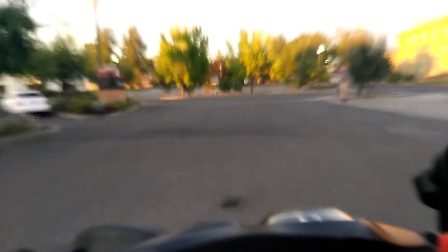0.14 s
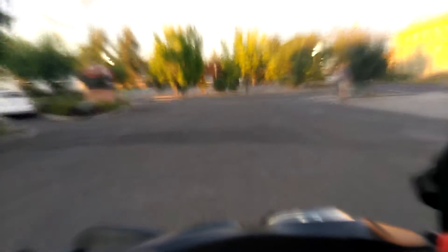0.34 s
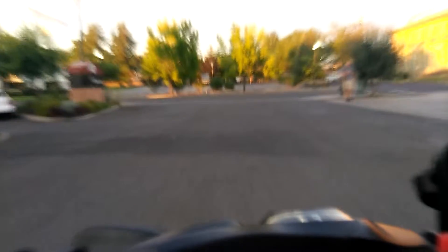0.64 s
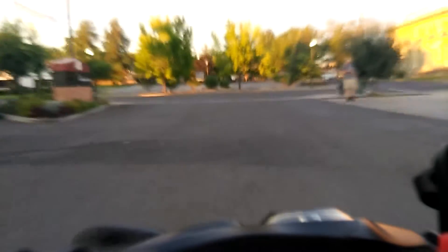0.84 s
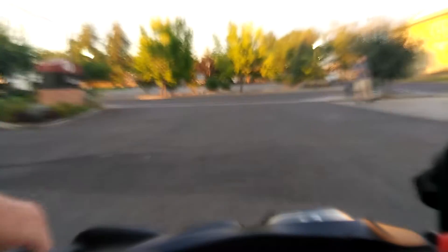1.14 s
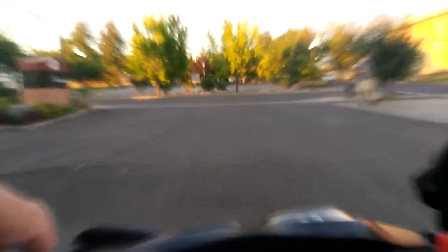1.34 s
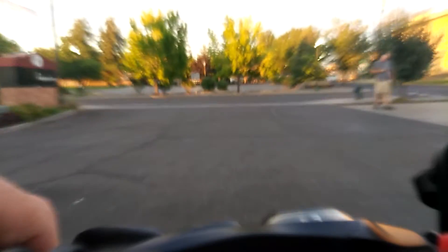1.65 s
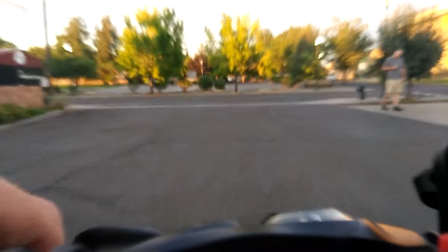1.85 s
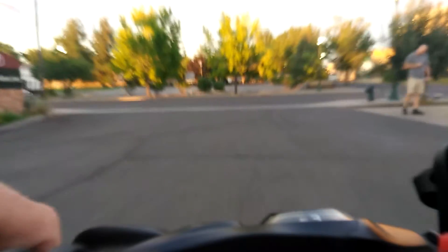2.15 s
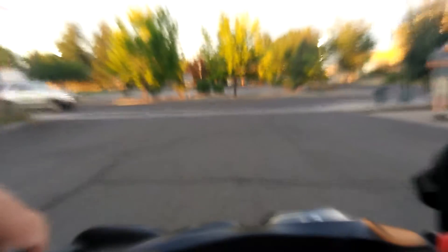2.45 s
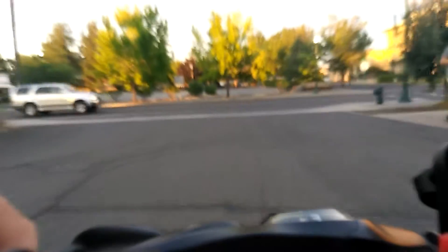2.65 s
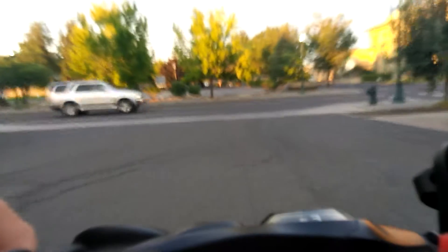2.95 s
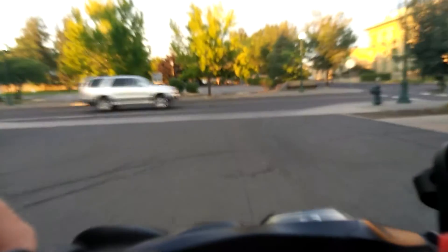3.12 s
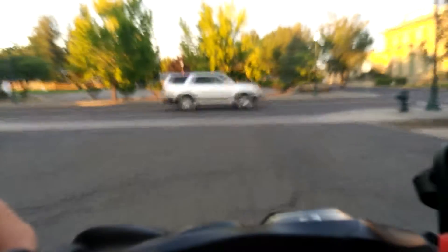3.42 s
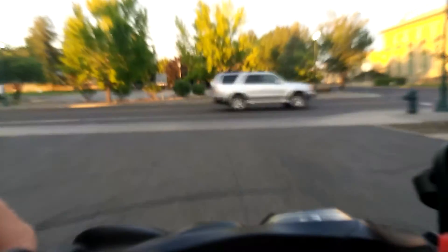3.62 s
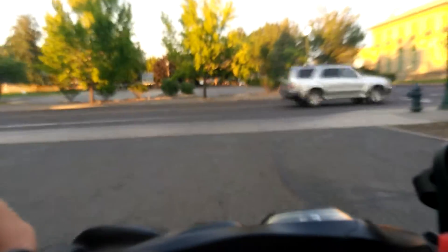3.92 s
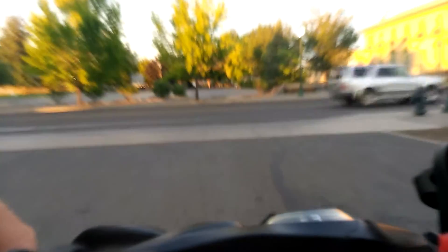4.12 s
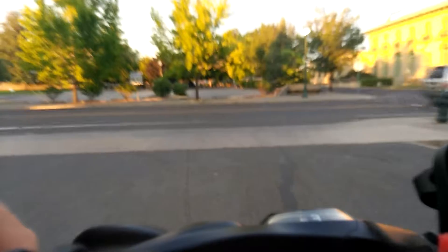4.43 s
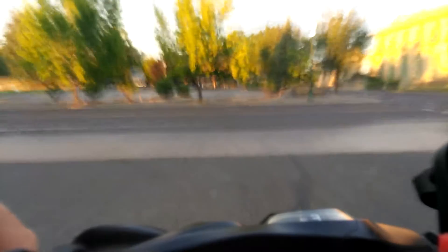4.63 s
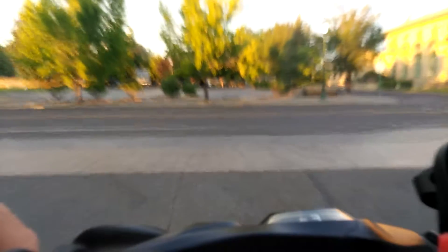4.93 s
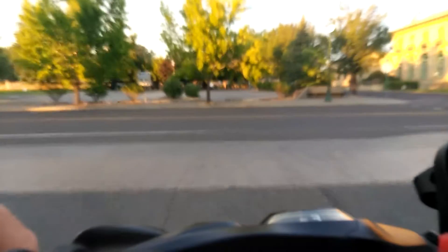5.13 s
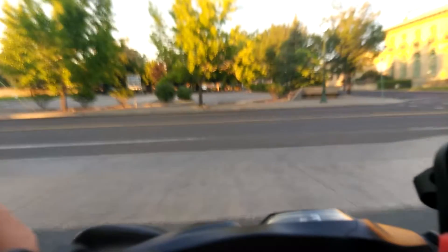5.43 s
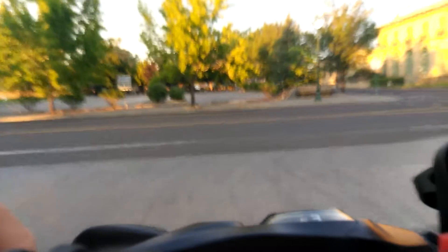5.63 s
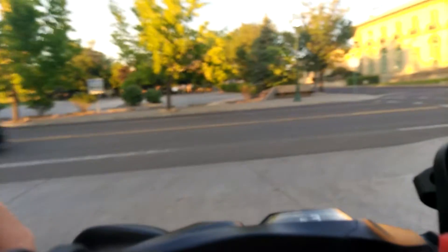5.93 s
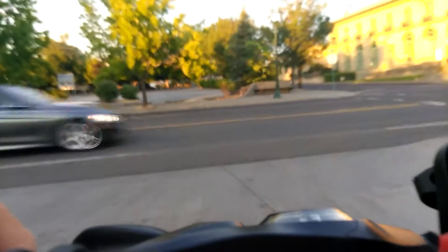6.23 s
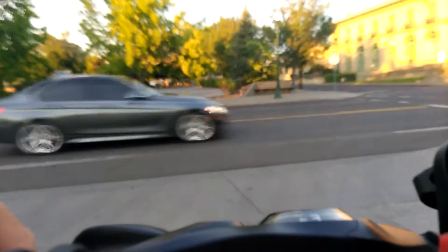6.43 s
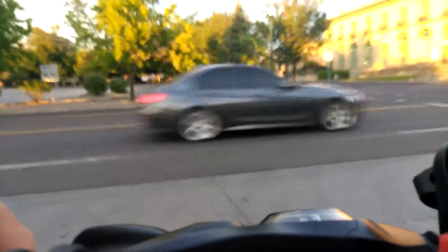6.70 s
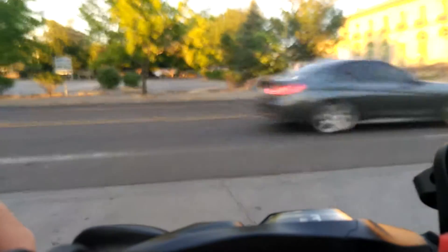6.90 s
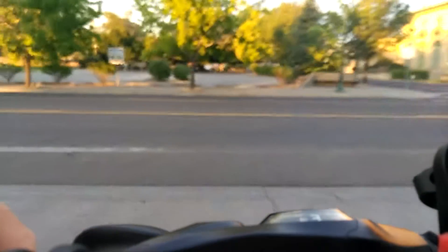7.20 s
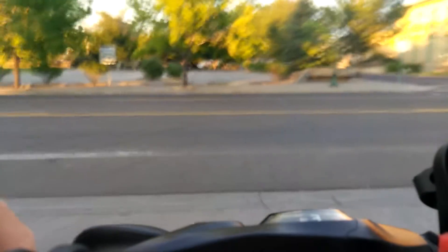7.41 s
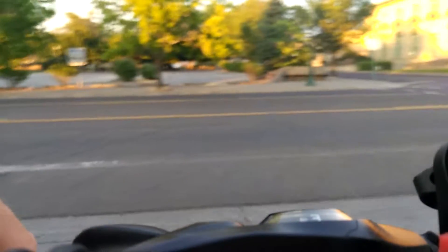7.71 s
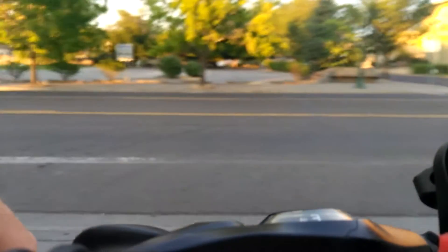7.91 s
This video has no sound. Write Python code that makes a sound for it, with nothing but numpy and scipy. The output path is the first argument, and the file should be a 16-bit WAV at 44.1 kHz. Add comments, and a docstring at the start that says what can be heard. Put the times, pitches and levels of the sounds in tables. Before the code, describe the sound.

A coasting bicycle ticks and rattles, then its disc brake squeals in high pulses and sharp shrieks as two cars pass.

```python
"""A car park beside a road, heard from a stereo camera on the frame of a bicycle that coasts to a stop.
Further off, two cars roll past on humming tyres and the first pulls away. The asphalt rumbles up through
the frame, cracks thump and loose parts chatter. Close to the microphones the freewheel pawls tick as the
wheel slows and the brake pad hisses on the disc. In front of it all the disc squeals: in swells as its
high spots pass the pad, in sharp shrieks when the pad grabs."""
import sys
import numpy as np
from scipy import signal
from scipy.fft import rfft, irfft, next_fast_len
from scipy.io import wavfile
from scipy.ndimage import uniform_filter1d, map_coordinates

SR = 44100
rng = np.random.default_rng(int(sys.argv[2]) if len(sys.argv) > 2 else 0)


def generate_wav(sig):
    """Save sig (samples, or channels by samples) to the path in sys.argv[1] as 16-bit PCM at SR."""
    pcm = np.round(np.clip(np.atleast_2d(sig).T, -1, 1) * 32767).astype(np.int16)
    wavfile.write(sys.argv[1], SR, pcm)


N = 355446
T = np.arange(N) / SR
TOP_HZ = 15900  # upper limit of the camera's sound


def undb(db):
    """Decibels to amplitude."""
    return 10 ** (np.asarray(db) / 20)


def curve(rows):
    """Columns of a table, joined by straight lines in time."""
    s, *columns = np.transpose(rows)
    return [np.interp(T, s, c) for c in columns]


def sides(pan_db):
    """Left and right gains that keep the total power; pan is left minus right."""
    left = 1 / (1 + 10 ** (-np.asarray(pan_db) / 10))
    return np.sqrt(2 * np.vstack([left, 1 - left]))


def noise(modes, alike, order=1):
    """Stereo noise of rms 1 through resonances; alike = likeness of the two channels."""
    size = next_fast_len(N, real=True)
    hz = np.fft.rfftfreq(size, 1 / SR) + 1
    power = sum(undb(db) ** 2 / (1 + ((hz - f * f / hz) / w) ** 2) ** order for f, w, db in modes)
    mid, side = irfft(rfft(rng.standard_normal((2, size))) * np.sqrt(power), size)[:, :N]
    out = np.sqrt(1 + alike) * mid + np.sqrt(1 - alike) * side * np.array([[1], [-1]])
    return out / out.std()


def walk(rate):
    """Random levels held 1 / rate s and smoothed twice; spread near 1."""
    k = int(SR / rate)
    steps = np.repeat(rng.standard_normal(N // k + 1), k)
    return 1.527 * uniform_filter1d(uniform_filter1d(steps, k), k)[:N]


def burst(rise_s, fall_s):
    """Envelope with an exponential rise and fall, peak 1."""
    t = np.arange(int(8 * fall_s * SR)) / SR
    shape = (1 - np.exp(-t / rise_s)) * np.exp(-t / fall_s)
    return shape / shape.max()


# First car's engine, out on the road: t/s, firing f/Hz, level/dB, octave level/dB
FIRING = [(3.3, 74, -51.5, -53), (3.84, 68.83, -43, -47), (4.38, 72.3, -56, -54.5),
          (4.66, 75.77, -44, -49.5), (5.38, 75.96, -56, -59), (5.95, 86.35, -49.5, -57.5),
          (6.1, 74.4, -67, -58)]

def engine():
    """A car pulls away: its firing tone and the octave, slightly unsteady."""
    silent_start = (FIRING[0][0] - .2, FIRING[0][1], -75, -75)
    silent_end = (FIRING[-1][0] + .3, FIRING[-1][1], -75, -75)
    hz, db, octave_db = curve([silent_start, *FIRING, silent_end])
    phase = 2 * np.pi * np.cumsum(hz + 1.523 * walk(11)) / SR
    tone = undb(db + 2 * walk(10)) * np.sin(phase)
    octave = undb(octave_db + 2 * walk(10)) * np.sin(2 * phase)
    return np.sqrt(2) * (tone + octave)


# Tyres out on the road: t/s, roar level/dB, hum level/dB, spray level/dB
TYRE_LEVELS = [(0.0, -61, -70, -61.5), (0.56, -66, -68, -70), (1.3, -63.5, -62, -66), (1.77, -60, -67, -75),
               (2.15, -63.5, -63, -69), (2.49, -44, -49, -65), (2.6, -49.5, -49, -59),
               (2.67, -41, -47.5, -57), (2.9, -40, -41.5, -52), (3.03, -41.5, -47, -54.5),
               (3.12, -35.5, -44, -53), (3.21, -41.5, -44, -54), (3.3, -40, -52.5, -51.5),
               (3.55, -39.5, -47, -53.5), (3.59, -49, -49.5, -51.5), (4.02, -47.5, -46.5, -45),
               (4.22, -53, -48, -47.5), (4.35, -49.5, -46, -49), (4.49, -55.5, -55, -53),
               (5.07, -53.5, -57.5, -54.5), (5.57, -49.5, -47, -50.5), (6.08, -43.5, -48.5, -51.5),
               (6.22, -51.5, -53.5, -52), (6.42, -42, -46.5, -53.5), (6.53, -52.5, -49, -57.5),
               (6.89, -45, -48.5, -53.5), (6.93, -46.5, -44, -54), (7.39, -57.5, -58.5, -53),
               (7.7, -58, -53.5, -55.5), (8.06, -57.5, -56, -56.5)]
# Their upper hiss: t/s, level/dB
HISS_LEVELS = [(0, -76), (2.8, -74), (3.7, -61), (4.1, -57), (4.5, -62), (4.7, -58), (5.0, -65), (6.0, -66),
               (8.06, -66)]
# Bands of the low roar, tread hum (a dull set, a bright set) and spray: f/Hz, width/Hz, level/dB
ROAR_MODES = [(501.5, 126, 0.5), (621, 142, 0)]
HUM_MODES = [
    [(866, 170, -2.5), (980, 530, -1)],
    [(1070, 330, -0.5), (952, 550, -4)],
]
SPRAY_MODES = [(1440, 260, -0.5), (1720, 360, 0), (2150, 400, -5)]
# Each car straight ahead of the camera: t/s
AHEAD_S = [3.58, 6.77]
NEXT_CAR_S, SWEEP_PER_S, PORT_LAG_MS = 5.0, 0.83, 0.48  # sweep is speed over distance

def cars():
    """Tyre noise in the resonances of tread and wheel arch reaches the nearer microphone first."""
    roar_db, hum_db, spray_db = curve(TYRE_LEVELS)
    waver_db = 1.1 * walk(22)
    bright = np.clip(0.57 + (hum_db - roar_db) / 14, 0, 1)
    roar = undb(roar_db + waver_db + 1.84 * walk(40)) * noise(ROAR_MODES, 0.87, order=2)
    hum_gain = undb(hum_db + waver_db + 1.6 * walk(30))
    dull_hum = np.sqrt(1 - bright) * noise(HUM_MODES[0], 0.57, order=3)
    bright_hum = np.sqrt(bright) * noise(HUM_MODES[1], 0.51, order=3)
    spray = undb(spray_db + .5 * waver_db + 1.65 * walk(15)) * noise(SPRAY_MODES, 0.24)
    hiss = undb(curve(HISS_LEVELS)[0] + 1.5 * walk(12)) * noise([(2900, 900, 0)], .4, order=2)
    tyres = roar + hum_gain * (dull_hum + bright_hum) + spray + hiss
    angle = np.arctan(SWEEP_PER_S * (np.where(T < NEXT_CAR_S, *AHEAD_S) - T))
    lag = uniform_filter1d(PORT_LAG_MS * np.sin(angle), size=8000) * SR / 1000
    tyres[0] = map_coordinates(tyres[0], [np.arange(N) - lag], order=1, mode="nearest")
    return sides(1.5) * tyres


# Rolling, carried up the frame to the camera: t/s, rumble level/dB, drone level/dB, boom level/dB
ROLLING = [(0.0, -48.5, -57, -55.5), (0.6, -48, -54, -61), (.75, -51.5, -55, -61), (1.1, -48.5, -55.5, -59),
           (1.3, -49.5, -55, -59), (1.43, -47, -45, -50.5), (1.7, -47, -47, -50), (1.95, -50, -49, -52.5),
           (2.2, -47.5, -45.5, -55.5), (2.7, -47, -51.5, -57), (3.2, -49, -51.5, -54),
           (3.7, -45.5, -49.5, -52.5), (4.42, -50, -52.5, -51.5), (4.69, -40, -53, -56),
           (4.89, -49.5, -54, -54), (6.0, -52.5, -50.5, -48), (6.8, -50.5, -50, -50),
           (7.4, -54.5, -53, -48.5), (8.06, -55.5, -56, -48)]
# Resonances of the rumble, frame drone and seat boom: f/Hz, width/Hz, level/dB
RUMBLE_MODES = [(50.13, 13, -8.5), (73, 22, 1), (101, 35.6, -1.5)]
FRAME_MODES = [(148.7, 57, 0.5), (186, 44, -4.5)]
SEAT_MODES = [(238, 65, 1), (299.4, 85, -7.5)]

def road():
    """The asphalt shakes the frame in lumps."""
    rumble_db, drone_db, boom_db = curve(ROLLING)
    lumps = walk(15)
    rumble = undb(rumble_db + 2.5 + 2 * lumps) * noise(RUMBLE_MODES, 0.49) * sides(0.034)
    drone = undb(drone_db + 1.4 * lumps + 1.5 * walk(25)) * noise(FRAME_MODES, 0.81, order=2)
    boom = undb(boom_db + 1.2 * lumps + 2.6 * walk(25)) * noise(SEAT_MODES, 0.73, order=2)
    return rumble + drone + boom


# Cracks under the wheels, just below the camera: t/s, level/dB, ring f/Hz, pan/dB
CRACKS = [(0.063, -30, 99.6, -12), (0.36, -27, 87, -19), (0.399, -28.5, 152, -15), (1.151, -38, 72, -2.5),
          (1.429, -33, 80, -7), (2.08, -34, 69.5, 5), (2.113, -27.5, 95, -12), (2.164, -28, 88, -13),
          (2.222, -27.5, 75, -14), (2.333, -27.5, 77.6, -8), (2.78, -35.5, 91.5, -1.0),
          (3.619, -32.5, 129, 10), (6.45, -28.5, 234, 3), (7.037, -30, 247, -2.0), (7.282, -33.5, 255, 4)]
THUMP_DECAY_CYCLES = 1.28

def thumps():
    """The frame rings for a few cycles after each crack."""
    out = np.zeros((2, N))
    for s, db, hz, pan_db in CRACKS:
        shape, i = burst(0.0048, THUMP_DECAY_CYCLES / hz), int(s * SR)
        ring = shape * np.sin(2 * np.pi * hz * T[:len(shape)])
        out[:, i:i + len(shape)] += sides(pan_db) * undb(db) * ring
    return out


# Spells of chatter near the camera: t/s, level/dB, rise/s, fall/s (each over 20 dB)
CHATTER = [(0.069, -45, 0.11, .1), (.27, -55, 0.022, 0.26), (.61, -57, 0.047, 0.12),
           (.83, -56, 0.059, 0.18), (.97, -53, 0.068, 0.081), (1.48, -65, 1, 0.21), (1.71, -61, 0.03, .02),
           (3.0, -53.5, 0.71, 0.61)]

def rattle():
    """Rough asphalt shakes loose parts into a dense, uneven patter of small metal clicks."""
    timing, strength = rng.random((2, N))
    clicks = (timing < 260 / SR) * undb(-5.5 * np.log(strength + 1e-9))
    patter = signal.fftconvolve(clicks, burst(0.00037, 0.0029))[:N]
    patter /= np.sqrt(uniform_filter1d(patter ** 2, int(.08 * SR)) + 0.00078)  # evens out the level
    spells_db = [db - 20 * np.maximum((s - T) / rise, (T - s) / fall) for s, db, rise, fall in CHATTER]
    metal = noise([(2280, 1800, -8.5), (3900, 3200, -7), (5500, 1200, 3), (7020, 1800, 1.5)],
                  0.066, order=2)
    return undb(np.max(spells_db, axis=0) + 2.5) * (0.75 + .8 * patter) * metal


# Close clicks and knocks, low throbs from the road: t/s, peak level/dB, pan/dB, f/Hz, width/Hz, length/s
NOISE_BURSTS = [(0.028, -30, -14, 4020, 2300, 0.0029), (0.056, -31, -10, 4500, 2500, .003),
                (0.079, -14.5, -20, 3630, 4170, 0.0014), (0.127, -33, -17, 4830, 2300, 0.0046),
                (.134, -30.5, -17, 3000, 3000, .002), (.260, -34, -8, 5340, 2300, 0.0065),
                (0.311, -38, -11, 3000, 2500, .002), (0.367, -30.5, -14, 2120, 2600, 0.0033),
                (0.604, -36, 12, 2600, 2600, 0.0017), (0.61, -40, 12, 2900, 2300, .006),
                (0.798, -39.5, -4, 2600, 2600, .002), (0.856, -43, -2, 3200, 2600, 0.0018),
                (0.944, -33, -13, 5660, 3000, 0.0058), (0.964, -32.5, 10, 3630, 2300, .004),
                (0.992, -34.5, -7, 2500, 2300, 0.0024), (1.35, -44, 0, 2500, 1200, 0.0036),
                (1.488, -27.5, 3, 2100, 1500, 0.0038), (1.486, -33.5, 6, 1000, 895, .008),
                (2.234, -38.5, 0, 2980, 3000, 0.0033), (2.363, -46, 0, 2500, 2500, .003),
                (3.098, -28, -2, 400, 250, 0.027), (3.278, -29, 2, 525, 220, 0.018),
                (3.4, -26, 0, 523, 200, 0.023), (3.625, -29, 1, 377, 250, 0.032),
                (3.964, -26, -16, 1700, 1500, 0.004), (3.964, -37, -18, 3250, 1000, 0.0037),
                (4.044, -31, 3, 880, 200, 0.021), (4.125, -14.5, 22, 9230, 600, .03),
                (4.127, -31, 14, 13600, 2300, 0.022), (4.129, -33, 0, 3730, 1190, 0.016),
                (4.899, -36, 7, 12600, 2300, 0.0079), (5.532, -35, -1, 1930, 1990, 0.0049),
                (5.722, -27, 7, 9400, 600, 0.0052), (5.99, -32, 2, 500, 200, .03),
                (6.09, -30, 2, 500, 200, .04), (6.4, -31, 2, 520, 250, .04),
                (6.172, -32, 3, 14300, 2000, .004), (6.171, -35, 3, 8260, 1500, 0.0047),
                (7.082, -36, 5, 8400, 2010, .006), (7.622, -32, 1, 9000, 900, .005),
                (7.705, -32, 5.5, 905, 600, .014), (7.713, -32.5, 3, 1700, 1095, 0.026),
                (7.878, -42, 7.5, 8930, 2000, .008), (7.906, -41, 3, 9000, 2000, 0.0049),
                (8.003, -35, -2.5, 8830, 2320, 0.013), (8.016, -38, 3, 9100, 2000, 0.011),
                (8.026, -39, -2, 9040, 2000, 0.0098)]

def knocks_and_throbs():
    """Short noise bursts: close clicks and knocks, and low throbs in the passing cars' tyre roar."""
    out, grit = np.zeros((2, N)), rng.standard_normal((2, N))
    for s, db, pan_db, hz, width_hz, length in NOISE_BURSTS:
        shape, i = burst(rise_s=0.13 * length, fall_s=length / 2), int(s * SR)
        edges_hz = [hz - width_hz / 2, min(hz + width_hz / 2, TOP_HZ)]
        push = grit[:, i:i + len(shape)] * shape[:N - i]
        push[:, 4:7] += 2.5  # a sharp onset
        pulse = signal.sosfilt(signal.butter(2, edges_hz, "band", fs=SR, output="sos"), push)
        out[:, i:i + len(shape)] += undb(db) * sides(pan_db) * pulse / np.abs(pulse).max()
    return out


# Teeth passing the pawls; the wheel slows, cranking forward or back lowers or raises the rate: t/s, f/Hz
TOOTH_RATE = [(0.0, 34.34), (0.48, 34.37), (0.83, 30.55), (1.3, 34.01), (1.53, 11.79), (1.64, 13.82),
              (1.71, 7.93), (2.0, 13.83), (2.33, 32.78), (3.63, 28.63), (4.0, 26.53), (4.05, 27.29),
              (5.46, 21.44), (6.86, 12.44), (7.06, 15.89), (7.64, 40.75), (7.79, 17.97)]
# Pawl ticks, close and a little to the left: t/s, level/dB
TICK_LEVELS = [(0.01, -45), (0.16, -39), (0.22, -49), (.9, -52.5), (.98, -44), (1.22, -52.5), (1.54, -52.5),
               (1.7, -43.5), (2.16, -49.5), (2.27, -47), (2.55, -50), (2.9, -44), (3.16, -36), (3.53, -42),
               (4.11, -41.5), (5.03, -43.5), (7.04, -40.5), (7.43, -38), (7.49, -33), (7.55, -39),
               (7.79, -57)]
# Hub shell resonances: f/Hz, width/Hz, level/dB
SHELL_MODES = [(7240, 1560, -4), (8600, 380, 0.5), (9256, 290, 3.5)]
# Top treble contour, which the ticks and the pad hiss each scale: t/s, relative level/dB
TOP_TREBLE = [(0, -4), (.2, 3.5), (.42, 7), (.47, -4.5), (1.2, -8.5), (1.6, 2), (2.45, 6), (2.7, 2.5),
              (3.4, -3.5), (3.45, -14), (4.15, -31), (4.19, -7), (4.35, -24), (5.0, -13.5), (5.4, -10),
              (5.75, -5.5), (6.3, -3), (6.6, -20), (7.4, -15), (7.52, -3), (8.06, 1)]
FIRST_TICK_S, STOP_S = .0105, 7.79

def freewheel():
    """At every tooth the pawls drop, a little unevenly; the hub shell rattles briefly and rings out."""
    turning = (T >= FIRST_TICK_S) * (T < STOP_S)
    teeth = np.cumsum(curve(TOOTH_RATE)[0] * turning) / SR
    at = np.searchsorted(teeth, np.arange(int(teeth[-1]) + 1) + 1e-9)
    ring_scatter, sparkle_scatter, jitter = rng.standard_normal((len(at), 3)).T
    at = np.clip(at + (0.00087 * SR * jitter).astype(int), 0, N - 1)
    drops = np.zeros((2, N))
    drops[:, at] = undb([2.6 * ring_scatter, 2.8 * sparkle_scatter])
    tick = burst(.003, 0.0039)
    shape = burst(.003, 0.014) * undb(-20)  # faint tail under the tick
    shape[:len(tick)] += tick
    shake = signal.fftconvolve(drops, shape[None], axes=1)[:, :N] * undb(2.36 * walk(500))
    ring = noise(SHELL_MODES, 0.045, order=2)
    sparkle = noise([(10000, 1600, -2.5), (14300, 5000, -0.5)], 0.099, order=2)
    sparkle *= undb(1.1 * curve(TOP_TREBLE)[0] - 0.1)
    return undb(curve(TICK_LEVELS)[0] - 0.9) * (shake[0] * ring + shake[1] * sparkle) * sides(4.2)


# Brake pad hiss, close by: t/s, level/dB
PAD_LEVELS = [(0.0, -58), (0.22, -62), (0.42, -68), (0.47, -76), (2.38, -70), (2.69, -63.5), (2.95, -51),
              (3.28, -45), (4.0, -49), (4.6, -49), (5.9, -56.5), (6.3, -48), (6.45, -56), (6.7, -50),
              (7.36, -49.5), (7.5, -44.5), (7.77, -66.5), (8.06, -58.5)]
# Higher disc modes that friction sets ringing, here and in the shrieks: f/Hz, width/Hz, level/dB
HIGH_DISC_MODES = [(7400, 70, 3), (7660, 70, 4), (7830, 90, 4), (8200, 70, 6), (8200, 60, 6), (8860, 80, 4),
                   (9220, 90, 5), (9420, 90, 4)]

def pad_hiss():
    """The pad rubs on the disc with a gritty hiss, and a thinner hiss above it."""
    pad_bands = [(7260, 1260, -6.5), (8110, 910, -1), (8970, 530, 1), (6270, 1070, -4)]
    pad = noise(pad_bands + HIGH_DISC_MODES, 0.056, order=3)
    top = noise([(10460, 2200, 0), (13300, 2600, -1.5), (14900, 1840, -1.693)], 0.066, order=2)
    top_db = 1.26 * curve(TOP_TREBLE)[0] - 3 + 1.4 * walk(28)
    grit_db = 2 * walk(90) + 2.2 * walk(400) + 2 * walk(11)
    return sides(2.2) * undb(curve(PAD_LEVELS)[0]) * (undb(grit_db) * pad + undb(top_db) * top)


# High spots of the disc passing the pad, close by, one list per steady mode: t/s, level/dB, pan/dB
HIGH_SPOTS = [
    [(3.088, -39.5, 7), (3.173, -44, 2), (3.324, -41, 5), (3.413, -39.5, 1), (3.505, -42, 2),
     (3.573, -41, -10), (3.641, -44, -21), (3.712, -39.5, -3), (3.79, -37, 2), (3.872, -29, 2),
     (3.95, -28, 0), (4.042, -31, 6), (4.125, -32.5, 8), (4.2, -37.5, 9), (4.294, -32, 2),
     (4.383, -31.5, 14), (4.491, -21.5, 8), (4.573, -30.5, -8), (4.644, -28, -1), (4.741, -27, 0),
     (4.857, -37, -4), (4.933, -44, -10), (5.02, -40, 3), (5.12, -39.5, 4), (5.235, -27, 3),
     (5.29, -29.5, 10), (5.34, -27, 5), (5.434, -29, -2), (5.547, -36, 1), (5.65, -32, 5),
     (5.748, -37.5, 6), (5.862, -34.5, 6), (5.996, -30.5, 8), (6.109, -26, 7), (6.26, -24, 2),
     (6.383, -41.5, -4), (6.698, -30, -0.5), (6.842, -38.5, -2), (6.89, -53, -2), (7.033, -24, -14),
     (7.229, -24.5, 15), (7.42, -34.5, 1.5), (7.459, -27.5, 3)],
    [(4.575, -52, 0), (4.68, -59, 0), (5.238, -44, 10), (5.346, -41, 2), (5.447, -37.5, 5),
     (5.659, -45.5, 0)],
]
DISC_HZ, DISC_WAVER_HZ = (6375, 5575), (11., 20.)  # each mode's pitch and quick waver
SWELL_S, SWELL_S_PER_DB, SWELL_REF_DB = .032, 0.0019, -36.5  # louder swells last a little longer

def disc_swells():
    """Each mode grows and dies exponentially at a high spot and hums on faintly around it."""
    out = np.zeros((2, N))
    for hz, waver_hz, spots in zip(DISC_HZ, DISC_WAVER_HZ, HIGH_SPOTS):
        size = np.zeros((2, N))
        for s, db, pan_db in spots:
            length = SWELL_S + SWELL_S_PER_DB * (db - SWELL_REF_DB)
            near = slice(int((s - .2) * SR), int((s + .2) * SR))
            size[:, near] += sides(pan_db) * undb(db) / np.cosh(1.88 * (T[near] - s) / length) ** 2
        size += 0.25 * uniform_filter1d(size, int(.15 * SR))
        size *= undb(1.74 * np.array([walk(90), walk(90)]))
        phase = 2 * np.pi * np.cumsum(hz + 5.8 * walk(30) + waver_hz * walk(150)) / SR
        # the vibration pattern turns with the disc, so the phase between the microphones wanders
        phase = phase + np.array([np.zeros(N), 1 + 0.85 * walk(9)])
        octave = undb(-58) * np.abs(size) ** .3 * walk(250) * np.sin(2 * phase)
        out += np.sqrt(2) * (size * np.sin(phase) + octave)
    return out


# The pad grabbing the disc, close and loud: t/s, hold/s, level/dB, pan/dB, start f/Hz, glide/Hz
PAD_GRABS = [(3.288, 0.015, -5.5, 2.5, 5923, -39), (3.33, 0.013, -30, -5, 5760, -58),
             (3.361, 0.016, -24.5, 2, 5840, 40), (3.399, .004, -37, 0, 5760, 0),
             (6.181, 0.0094, -28, 11, 6090, -31), (6.212, 0.027, -12.5, 3, 5936, 16.5),
             (6.238, 0.009, -3, 0, 6050, 49), (6.253, .002, -6, -4, 6060, 0),
             (6.256, 0.0099, -8.5, 9, 5950, 20), (6.274, .005, -8, 6, 6000, 22),
             (6.283, .005, -9.5, 3, 6010, 0), (6.298, 0.0066, -18, 7, 6140, -17),
             (6.32, 0.018, -20.5, 1, 6070, -30.5), (6.54, 0.008, -18.5, 11, 5984, -10),
             (6.554, .004, -19, 9, 5975, -5), (6.574, 0.029, -16, 7, 6050, 49),
             (6.621, 0.021, -23.5, 4, 6090, -37), (6.672, 0.013, -9.5, 4, 5900, 60),
             (6.691, .004, -8, 2, 6000, 40), (6.7, .015, -18, 5, 5990, 0),
             (6.717, 0.037, -22.5, 7, 5914, 69.5), (6.964, .012, -38.5, 8, 5900, -12),
             (7.137, 0.02, -17.5, 5.5, 5964, 3), (7.205, 0.034, -23, 11, 5875, 109.5),
             (7.324, 0.027, -20, 10.5, 6080, 11.5), (7.417, 0.02, -18.5, 4.5, 5970, 41),
             (7.44, 0.01, -3.5, 0, 6013, 65.5), (7.456, .003, -9, -4, 6100, 9.5),
             (7.468, .004, -12.5, 0.5, 6066, -30), (7.473, .007, -19.5, 1, 6000, -22),
             (7.511, 0.011, -35.5, -7, 5980, -1)]
GROW_DB_S, HOLD_DB_S, DIE_DB_S = 1303, 116, 1999  # a grab grows, swells through the hold and lets go
SNAP_DB, SNAP_DB_S = -8, 2800  # the last part of the growth snaps in
RING_DB, RING_DB_S = -21, 299  # afterwards the disc rings on more faintly

def grabs():
    """Level, pan and pitch of the shriek: the strongest grab of the moment leads."""
    db, pan_db, hz = np.full(N, -90.), np.zeros(N), np.full(N, 6000.)
    for s, hold, top_db, side_db, start_hz, glide in PAD_GRABS:
        near = slice(int((s - .1) * SR), int((s + .35) * SR))
        t = T[near] - s
        early, late = np.minimum(t, 0), np.maximum(t - hold, 0)
        attack_db = np.maximum(SNAP_DB_S * early, SNAP_DB * (t < 0) + GROW_DB_S * early)
        hold_db = -HOLD_DB_S * np.clip(hold - t, 0, hold)
        release_db = np.maximum(-DIE_DB_S * late, RING_DB - RING_DB_S * late)
        grab_db = top_db + attack_db + hold_db + release_db
        leads = grab_db > db[near]
        db[near] = np.where(leads, grab_db, db[near])
        pan_db[near] = np.where(leads, side_db, pan_db[near])
        hz[near] = np.where(leads, start_hz + glide * np.clip(t / hold, 0, 1), hz[near])
    return (uniform_filter1d(track, size=150) for track in (db, pan_db, hz))


# Rasp of the slipping pad: f/Hz, width/Hz, level/dB
RASP_BANDS = [(3300, 500, -20), (4450, 500, -17), (6200, 1250, -2), (8250, 1800, -6), (11900, 1700, -4.5),
              (14500, 2800, -12.5)]
RASP_TAIL_S = 0.0073

def disc_shrieks():
    """At each grab a looser mode sings with a faint octave; hard slips add rasp and higher modes."""
    db, pan_db, hz = grabs()
    size = undb(db)
    phase = 2 * np.pi * np.cumsum(hz + 12.9 * walk(150)) / SR + np.array([[0], [1.8]])
    # the tone grows clean; the energy stored so far spills into neighbour modes, which beat against it
    stored = signal.lfilter([1 / (0.033 * SR)], [1, 1 / (0.038 * SR) - 1], size)
    rough = np.clip(0.09 + 0.17 * stored / (size + 1e-6), 0, 1)
    neighbours = np.array([walk(220) + 1j * walk(220) for _ in range(2)])
    beating = (1 + rough * neighbours) / np.sqrt(1 + 2 * rough ** 2)
    tone = np.sqrt(2) * np.imag(beating * (np.exp(1j * phase) + undb(-20) * np.exp(2j * phase)))
    # the rasp grows faster than the tone and lingers
    slip = size * undb(-24 + .6 * (db + 12))
    slip = signal.lfilter([1 / (RASP_TAIL_S * SR)], [1, 1 / (RASP_TAIL_S * SR) - 1], slip)
    rasp = slip * undb(3 * walk(250)) * noise(RASP_BANDS + HIGH_DISC_MODES, 0.2, order=2)
    return sides(pan_db) * (size * tone + rasp)


def scene():
    """All sources at the camera; the ground and parked cars scatter a short echo of the squeal."""
    squeal = disc_swells() + disc_shrieks()
    tail = rng.standard_normal((2, 6000)) * undb(-60 * T[:6000] / 0.18)  # 60 dB down in 0.18 s
    tail /= np.sqrt(np.sum(tail ** 2, axis=1, keepdims=True))
    echo = undb(-13) * signal.fftconvolve(squeal, tail, axes=1)[:, :N]
    foreground = squeal + echo + freewheel() + pad_hiss()
    return foreground + knocks_and_throbs() + rattle() + road() + thumps() + cars() + engine()


def record(dry):
    """The camera cuts the deep bass, rounds the loudest peaks and cuts the top."""
    bass_cut = signal.sosfilt(signal.butter(2, 30, "high", fs=SR, output="sos"), dry)
    rounded = .9 * np.tanh(bass_cut / .9)
    return signal.sosfilt(signal.ellip(10, .2, 80, TOP_HZ, fs=SR, output="sos"), rounded)


dry = scene()
out = record(dry)
generate_wav(out)
```